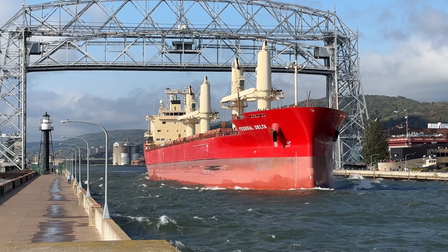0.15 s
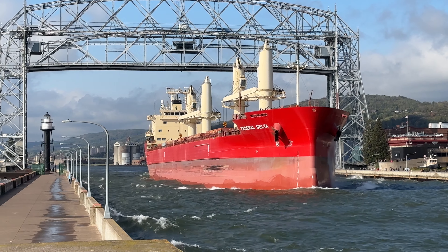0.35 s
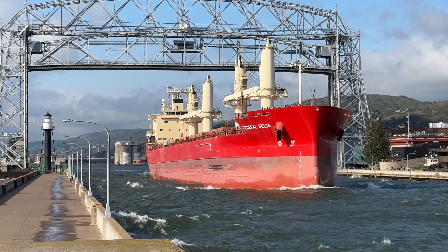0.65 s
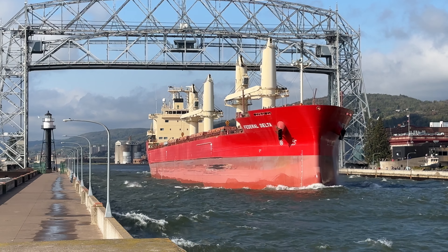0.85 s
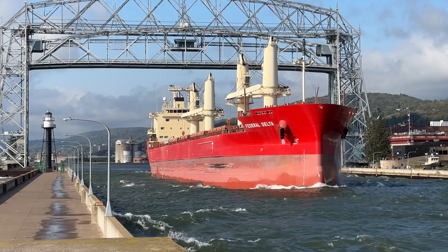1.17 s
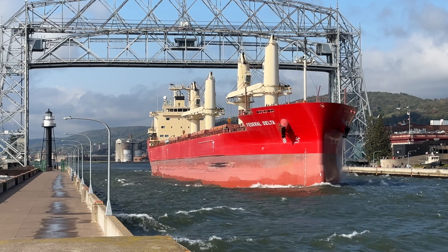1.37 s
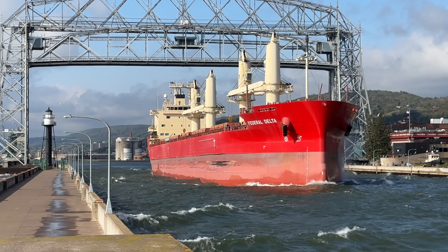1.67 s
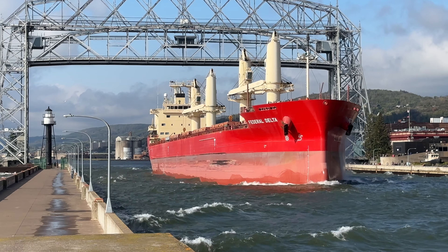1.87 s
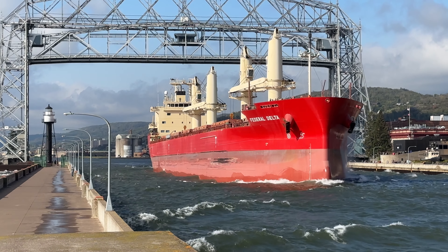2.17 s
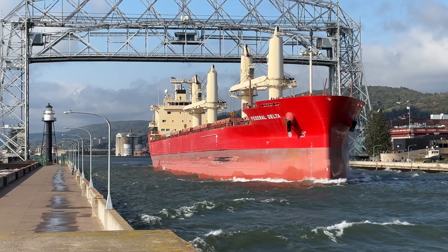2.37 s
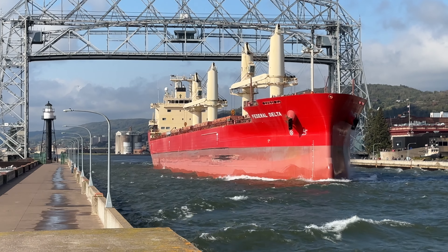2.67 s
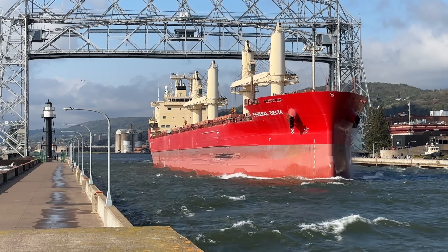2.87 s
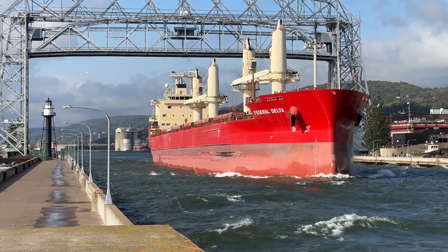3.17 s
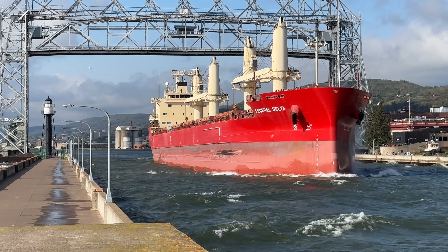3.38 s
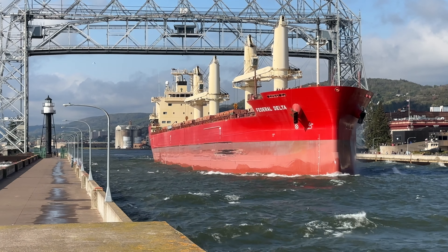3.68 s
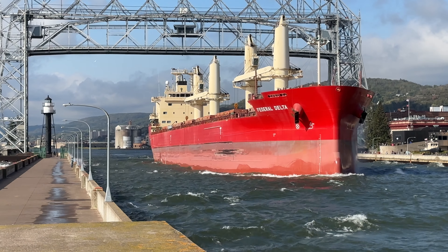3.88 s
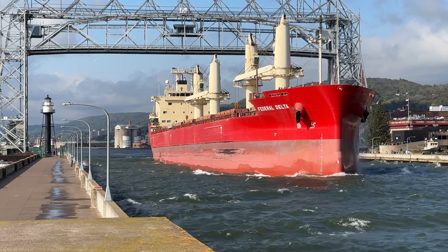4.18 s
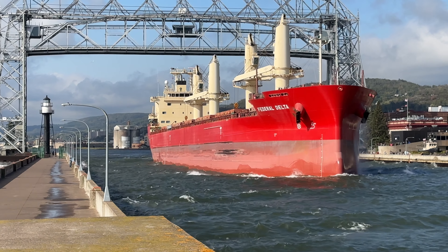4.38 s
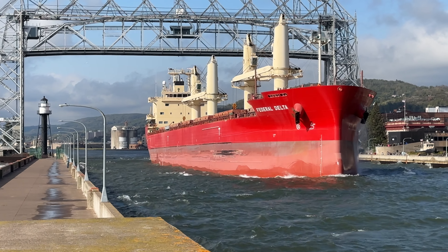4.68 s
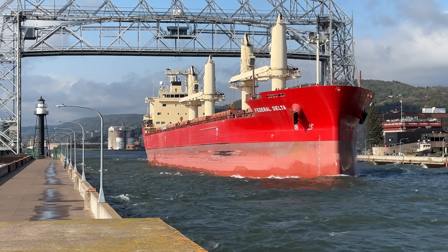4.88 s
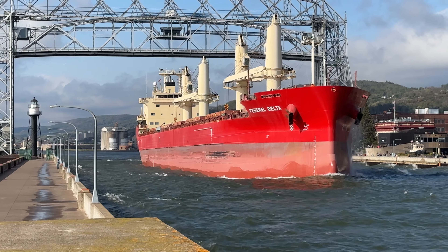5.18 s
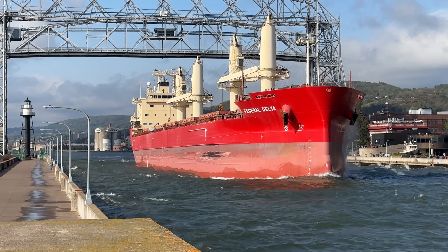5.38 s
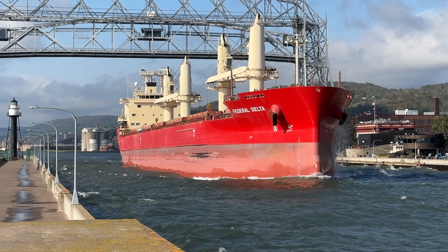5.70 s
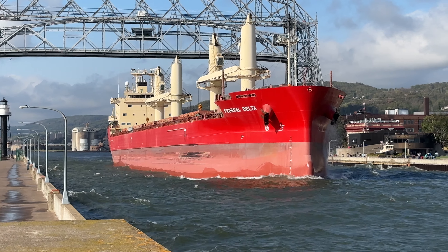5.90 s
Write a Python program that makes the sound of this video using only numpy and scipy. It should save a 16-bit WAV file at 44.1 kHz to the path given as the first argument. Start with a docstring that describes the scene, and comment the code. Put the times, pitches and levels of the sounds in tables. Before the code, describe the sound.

Outdoors by a harbour canal, a huge deep ship horn is already blaring, so loud the microphone distorts. After about a second it stops abruptly and rings off walls and hills. Low wind buffets, faint water wash and ticking spray drops follow. Then a higher, quieter chord of bridge air horns enters, wavering, with a small click and thump early on, and holds to the end.

```python
"""A freighter's deep horn, already sounding in a harbour canal, overloads the microphone, stops and echoes.
Gusts buffet the microphone and flick spray at it over the wash of the water; then a lift bridge answers
with a chord of higher air horns, which is spliced once with a short click and a low thump. Horn tones are
sums of wavering partials, echoes are convolutions with sparse or narrow-band returns, wind and water are
shaped noise, and drops are ticks through a resonant body."""
import sys
import numpy as np
from scipy import signal
from scipy.fft import rfft, irfft
from scipy.io import wavfile
from scipy.ndimage import uniform_filter1d

SR = 44100
rng = np.random.default_rng(int(sys.argv[2]) if len(sys.argv) > 2 else 0)


def waveform_to_disk(signal):
    """Save audio, clipped to [-1, 1], as 16-bit WAV at the path in sys.argv[1]."""
    frames = np.transpose(np.atleast_2d(signal))
    scaled = np.clip(frames, -1, 1) * 32767
    samples = np.round(scaled).astype(np.int16)
    wavfile.write(sys.argv[1], SR, samples)


N = 266628
T = np.arange(N) / SR


def amp(db):
    """Logarithmic level: decibels to amplitude gain."""
    return 10 ** (np.asarray(db) / 20)


def evened(x):
    """Normalisation by mean power: scaled to rms 1."""
    return x / np.sqrt(np.mean(x ** 2) + 1e-20)


def steady(x, size):
    """Envelope division: takes the slow swings out of a sound, leaving rms near 1."""
    local_power = uniform_filter1d(x ** 2, size)
    return x / np.sqrt(local_power + np.mean(x ** 2) / 20)


def read(points, hz):
    """Log-frequency interpolation: a spectrum's value at hz."""
    f, value = np.transpose(points)
    return np.interp(np.log(hz + 1), np.log(f + 1), value)


def curves(rows, t=T):
    """Linear interpolation in time: the columns of a time table at the times t."""
    s, *columns = np.transpose(rows)
    return [np.interp(t, s, column) for column in columns]


def noise(colour, size=N):
    """Spectral shaping: white noise filtered to the given spectrum, at rms 1."""
    spectrum = rfft(rng.standard_normal(size))
    gain = amp(read(colour, np.fft.rfftfreq(size, 1 / SR)))
    return evened(irfft(spectrum * gain, size))


def drift(rate, t=T):
    """Low-pass random modulation: slow chance of rms 1, up to about rate swings a second."""
    grid = np.linspace(-2, 8, 2048)
    hz = np.fft.rfftfreq(len(grid), grid[1] - grid[0])
    spectrum = rfft(rng.standard_normal(len(grid))) / (1 + (hz / rate) ** 4)
    return np.interp(t, grid, evened(irfft(spectrum)))


def partial_db(partials, top, k, hz):
    """Harmonic spectrum: partial k is listed if low, and read from the overtone envelope above."""
    return partials[k - 1] if k <= len(partials) else read(top, k * hz)


def harbour(x, colour, t60, delay):
    """Diffuse reverberation: sparse taps of random sign, each band decaying at its own rate."""
    taps = rng.choice([-1., 1.], 2 * SR) * (rng.random(2 * SR) < .1)
    hz, t, bands = signal.stft(taps, SR, nperseg=1024)
    bands = bands * amp(-60 * t / read(t60, hz)[:, None])
    tail = signal.istft(bands * amp(read(colour, hz))[:, None], SR, nperseg=1024)[1]
    tail = tail / np.linalg.norm(taps[:SR // 20])
    tail = np.r_[np.zeros(int(delay * SR)), tail]
    return signal.fftconvolve(x, tail)[:len(x)]


# ship's horn: a steady note that swells a little until the valve shuts
SHIP_HZ, SHUT_S, SWELL_DB_PER_S = 133, 0.9058, 2.5
# as the pressure falls the pitch sags, the overtones flare once and dull, and the note dies
SAG_HZ, SAG_S, FLARE_DB, FLARE_S, DULL_DB_PER_S = 10, 0.0274, 9, 0.037, 58
RELEASE_DB_PER_S, RELEASE_KNEE_S = 354.5, 0.037


def valve(t):
    """Pressure release: pitch, level and overtone boost under steady air, then as the valve shuts."""
    shut = np.maximum(t - SHUT_S, 0)
    swell = SWELL_DB_PER_S * np.clip(t, 0, SHUT_S)
    hz = SHIP_HZ - SAG_HZ * (1 - np.exp(-(shut / SAG_S) ** 2))
    db = swell - RELEASE_DB_PER_S * shut ** 2 / (shut + RELEASE_KNEE_S)
    flare = FLARE_DB * np.exp(-(2 * (shut / FLARE_S - 1)) ** 2)
    return hz, db, swell + flare - DULL_DB_PER_S * shut


# first eight partials early and late in the blast, as wind bends the path: one relative level [dB] each
SHIP_EARLY_PARTIALS = [-9, -.5, -12, -6, -16, -18, -21.5, -20]
SHIP_LATE_PARTIALS = [-4, -0.5, -9, -3.5, -20, -18, -20.5, -22.5]
# overtone envelope above them: (frequency [Hz], relative level [dB])
SHIP_OVERTONES = [(1200, -35.5), (1500, -38), (1800, -32.5), (2200, -38), (3000, -44), (4200, -44.5),
                  (7000, -52.5), (16000, -75)]
# distinct returns from the canal wall, buildings and hills:
# (delay [s], level [dB], lowest frequency [Hz], highest frequency [Hz])
DISTINCT_RETURNS = [(.13, -16, 70, 450), (.188, -10.5, 365.6, 440), (.25, -19, 870, 1000),
                    (.37, -21.5, 673, 747.6), (.17, -16, 2380, 2620), (.39, -17, 2380, 2580),
                    (.48, -28, 1740, 1920), (1.28, -56.5, 220, 420)]
# diffuse harbour echo: (frequency [Hz], relative level [dB])
ECHO_COLOUR = [(250, -9.5), (520, -18), (700, -0.5), (1000, 0), (1500, -7), (1850, 1.5), (2150, -9.5),
               (2500, 7), (2850, -0.5), (3500, -2.5), (7000, -30.5)]
# its reverberation time: (frequency [Hz], time to fall 60 dB [s])
ECHO_DECAY = [(130, 1.2), (700, .8), (1400, 1.4), (2450, 1.3), (7000, 0.18)]


def ship_horn(level_db=-6, overtone_db=1.0, echo_db=-20, blur_db=-7, far_db=-50, far_t60=3.5):
    """Periodic flow modulation: a diaphragm chops air into a long bell, and the harbour echoes it."""
    jitter, flutter, hiss_db, waver_db = .0013, .25, -28, 4.6
    t = np.arange(-SR, N) / SR  # begins a second early, so the harbour is already full of echo
    u = t[t < SHUT_S + .25]
    hz, db, bright_db = valve(u)
    phase = 2 * np.pi * np.cumsum(hz * (1 + jitter * drift(55, u))) / SR
    late = np.interp(u, [.48, .62], [0, 1])
    tone, waver = np.zeros(len(u)), drift(2, u)
    for k in range(1, 100):
        height = min(k / 10, 1)  # turbulent air disturbs short waves most, and neighbours alike
        waver = (waver + 2 * drift(3 + k / 10, u)) / np.hypot(1, 2)
        early_level = partial_db(SHIP_EARLY_PARTIALS, SHIP_OVERTONES, k, SHIP_HZ)
        late_level = partial_db(SHIP_LATE_PARTIALS, SHIP_OVERTONES, k, SHIP_HZ)
        level = (1 - late) * early_level + late * late_level
        level = level + height * (overtone_db + bright_db) + height ** 2 * waver_db * waver
        wander = height ** 2 * (drift(1.1, u) + flutter * drift(44, u))
        tone += amp(level) * np.sin(k * phase + wander)
    # air escapes in a puff each cycle
    hiss = noise([(400, -1.5), (1300, -6.5), (2600, -11.5), (7000, -19.0), (16000, -29.0)], len(u))
    tone += amp(hiss_db + bright_db / 2) * hiss * (1 + np.cos(phase) / 2)
    direct = np.pad(tone * amp(db + level_db), (0, len(t) - len(u)))

    returns = np.zeros(len(t))
    for delay, gain_db, lo, hi in DISTINCT_RETURNS:
        band = signal.butter(N=3, Wn=[lo, hi], btype="band", fs=SR, output="sos")
        returns += amp(gain_db) * signal.sosfilt(band, np.interp(t - delay, t, direct))
    # the returns a little blurred; the diffuse echo of nearby buildings; a long hum from the hills
    returns = returns + amp(blur_db) * harbour(returns, [(1, 0.0072)], [(1, 0.34)], delay=0)
    near = harbour(direct, ECHO_COLOUR, ECHO_DECAY, delay=.06)
    far_colour = [(130, -8.0), (270, -0.5), (530, -10), (4000, -21.5)]
    far = harbour(direct, far_colour, [(1, far_t60)], delay=0.21)
    return (direct + returns + amp(echo_db) * near + amp(far_db) * far)[SR:]


BREEZE_DB, GUST_ATTACK_S, GUST_RELEASE_S = -50, 0.028, 0.027
# gusts on the microphone, over a steady breeze: (start [s], length [s], level [dB])
GUST_TIMES = [(-0.1, 1.13, -41), (1.585, 0.15, -37.5), (2.369, 0.26, -33), (3.02, 0.37, -37),
              (3.156, 0.14, -29.5), (3.681, 0.056, -35.5), (3.746, 0.67, -47.5), (3.949, 0.07, -36),
              (4.375, 0.079, -37), (5.497, 0.086, -38)]


def wind_strength():
    """Addition of powers: each gust rises, holds and dies away on top of the breeze."""
    power = amp(BREEZE_DB) ** 2
    for start, length, db in GUST_TIMES:
        rise = np.clip((T - start) / GUST_ATTACK_S, 0, 1)
        fall = np.exp(-np.maximum(T - start - length, 0) / GUST_RELEASE_S)
        power = power + (amp(db) * rise * fall) ** 2
    return np.sqrt(power)


# spectrum of the turbulence: (frequency [Hz], relative level [dB])
WIND_COLOUR = [(12, -23), (20, -0.5), (83, -4.5), (171, -16.5), (357, -39), (1000, -54.5), (1600, -100)]
# single low thumps: pushes of air, and the last one the thump of the splice:
# (time [s], peak level [dB], pitch [Hz])
LOW_THUMPS = [(2.463, -19, 52.6), (3.083, -26.5, 50), (3.998, -27, 69), (4.768, -24, 130)]


def wind_and_thumps():
    """Turbulent pressure fluctuation: low noise at the microphone; single low thumps are added to it."""
    out = wind_strength() * steady(noise(WIND_COLOUR), size=4000)
    for s, db, hz in LOW_THUMPS:
        u = 2 * np.pi * hz * (T - s)
        out += amp(db) * u * np.exp((1 - u ** 2) / 2)  # one swing each way, peaking at 1
    return out


# spectrum of the wash: (frequency [Hz], relative level [dB per Hz])
WATER_COLOUR = [(100, -9), (280, -7.5), (600, -14.5), (3000, -31.5), (15000, -55)]


def water(level_db=-63.5):
    """Broadband noise of many small impacts: choppy water washes along the pier."""
    return amp(level_db + drift(2.3) / 2) * noise(WATER_COLOUR)


# fine spray falls at random over this stretch
SPRAY_FROM_S, SPRAY_TO_S = 2.3, 4.4
# larger drops of spray on the microphone: (time [s], relative level [dB])
LARGE_DROPS = [(2.393, -38), (2.4119, -39), (2.4818, -28), (2.5546, -49), (2.5722, -46), (2.5923, -27),
               (2.707, -39), (3.044, -50), (3.076, -37.5), (3.2137, -35), (3.2244, -23.5), (3.245, -36),
               (3.27, -29.5), (3.338, -34), (3.3572, -29), (3.3857, -37.5), (3.683, -37), (3.707, -23.5),
               (3.7328, -24.5), (3.7487, -28), (3.8087, -49), (3.819, -37), (3.8636, -35), (3.8822, -32),
               (3.9449, -31.5), (4.109, -42.5), (4.148, -32.5), (4.2529, -37.5), (4.2812, -45),
               (4.3006, -43), (4.3926, -30.5), (4.404, -31), (4.4917, -31), (4.6865, -24.5),
               (4.8673, -26.5), (4.9382, -29)]
# resonance of the body they strike: (frequency [Hz], gain [dB])
BODY_COLOUR = [(1500, -7), (2050, 10), (2900, 1.5), (6500, 8), (9000, 2), (15000, -28.5)]
# spectrum of the soft splash: (frequency [Hz], relative level [dB per Hz])
SPLASH_COLOUR = [(1500, -16), (2050, 2), (2700, -9), (7000, -12), (10000, -26.5)]


def spray(level_db=5, sizzle_db=-17, sizzle_s=0.0025, splash_db=-47, splash_s=0.02,
          fine_db=-45, fine_per_s=22, spread_db=7, full_gust_db=-40):
    """Impulse response: each large drop is a double tick on the microphone body, a sizzle and a splash."""
    t = np.arange(SR // 20) / SR
    # finer drops come with the gusts
    hits = (rng.random(N) < fine_per_s / SR) * amp(fine_db + spread_db * rng.uniform(-1, 1, N))
    hits *= np.minimum(wind_strength() / amp(full_gust_db), 1) * (T > SPRAY_FROM_S) * (T < SPRAY_TO_S)
    wet = np.zeros(N)
    for s, db in LARGE_DROPS:
        tick = rng.standard_normal(len(t)) * amp(sizzle_db) * np.exp(-t / sizzle_s)
        tick[0] = 1
        tick[rng.integers(2, 20)] += rng.random() - .5  # the second tick colours each drop differently
        part = hits[round((s + .001) * SR):][:len(t)]
        part += amp(db + level_db) * tick[:len(part)]  # a view: this adds into hits
        wet += amp(db) * (T > s) * np.exp(-abs(T - s) / splash_s)
    # minimum-phase response, so the body rings only after each hit
    log_gain = np.log(amp(read(BODY_COLOUR, abs(np.fft.fftfreq(2048, 1 / SR)))))
    body = np.fft.ifft(np.exp(np.conj(signal.hilbert(log_gain)))).real[:1024]
    splash = amp(splash_db) * np.sqrt(wet) * noise(SPLASH_COLOUR)
    return signal.fftconvolve(hits, body)[:N] + splash


# bridge horns, low to high; each reed starts sharp and settles:
# (start [s], pitch [Hz], relative level [dB], swell [dB per s], sharp by [Hz], attack [s])
BRIDGE_REEDS = [(4.375, 255.0, 1, -1, 2.917, 0.033), (4.39, 291.7, -13, 9, 2, 0.018),
                (4.366, 298.3, -.5, -2, 5.97, 0.017), (4.32, 355.0, -2.5, 3, 12.9, 0.019)]
# overtone envelope they share: (frequency [Hz], relative level [dB])
BRIDGE_OVERTONES = [(1800, -12.5), (2350, -19.5), (2700, -27.5), (3100, -21.5), (4200, -27.5), (4800, -41),
                    (6500, -43.5), (8500, -78)]


def air_horn(row, partials, hunt_hz, t, settle_s=0.0639, blur_s=0.24):
    """Self-sustained reed oscillation: it starts sharp and settles; partials waver over the water."""
    jitter, scatter, waver_db = .0024, .42, 4.4
    start, pitch, db, swell_db_per_s, sharp_hz, attack_s = row
    age = np.maximum(t - start, 0)
    hz = pitch + hunt_hz + sharp_hz * np.exp(-(age / settle_s) ** 2)
    settled = np.tanh(((t - t[0]) / blur_s) ** 2)  # reflections arrive and blur the short waves
    phase = 2 * np.pi * np.cumsum(hz * (1 + jitter * settled * drift(27, t))) / SR
    tone = np.zeros(len(t))
    for k in range(1, 28):
        level = partial_db(partials, BRIDGE_OVERTONES, k, pitch)
        level = level + waver_db * min(k / 2, 1) * drift(6.05, t)
        blur = scatter * k * pitch / 2000 * settled
        tone += amp(level) * np.sin(k * phase + 2 * np.pi * rng.random() + blur * drift(9.8, t))
    return tone * amp(db + swell_db_per_s * age) * np.minimum(age / attack_s, 1)


# the highest reed's opening bark, strong in odd partials: one level [dB] each, from the first up
BARK_LEVELS = [-31.5, -48, -34.5, -36, -30, -51.5, -32.5, -58, -48]


def bark(age, sharp_hz=15, settle_s=0.06, attack_s=0.028, decay_s=0.14, hiss_db=-56, top_db=-60):
    """Starting transient: the first air through the highest reed gives a sharp, hollow note and a puff."""
    phase = 2 * np.pi * np.cumsum(BRIDGE_REEDS[-1][1] + sharp_hz * np.exp(-age / settle_s)) / SR
    partials = list(BARK_LEVELS) + list(top_db + 2 * rng.standard_normal(10))
    tone = np.zeros(len(age))
    for k, db in enumerate(partials, 1):
        roughness = (k / 10) ** 2 * drift(80, age) / 2
        tone += amp(db) * np.sin(k * phase + 2 * np.pi * rng.random() + roughness)
    puff = amp(hiss_db) * noise([(6500, 0.5), (8500, -39)], len(age))
    return (tone + puff) * np.minimum(age / attack_s, 1) ** 2 * np.exp(-age / decay_s)


def whistle(t, at_s=4.57, length_s=0.096, level_db=-39):
    """Prominent harmonic: the eighth partial of the highest reed rings out as its pitch settles."""
    hz = 8 * BRIDGE_REEDS[-1][1]
    envelope = amp(level_db) * np.exp(-((t - at_s) / length_s) ** 2)
    return envelope * np.sin(2 * np.pi * hz * t + drift(20, t) / 2)


# first six partials of each bridge horn, in the order of the reeds: one relative level [dB] each
LOW_REED = [-0.5, -8.5, -3, -4.5, -9, -8]
FLAT_REED = [0.5, -3.5, -14, -3, -18.5, -10.5]
MIDDLE_REED = [2.5, -6, -2, -9, -20, -17]
HIGH_REED = [1, 1, -0.5, -19, -12.5, -13]
# the lowest reed hunts before it finds its note: (time [s], off pitch by [Hz])
LOW_REED_HUNT = [(4.49, -0.5), (4.53, 6.5), (4.77, 5.5), (4.83, -5), (4.94, -0.55), (6.05, 1)]
# spectrum of the rasping air: (frequency [Hz], relative level [dB])
RASP_COLOUR = [(120, 2), (260, -15.5), (1100, -4.5), (2100, -12.5), (2700, -15.5), (4100, -16.5),
               (6800, -35), (8500, -54)]
# the chord as the wind carries it: (time [s], bass level [dB], treble level [dB])
CHORD_LEVELS = [(4.4, -25.5, -41.5), (4.53, -24, -31), (4.78, -24, -43), (4.87, -22.5, -36),
                (5.1, -24, -43), (5.32, -24.5, -31), (5.63, -22, -40), (5.746, -28.5, -44.5),
                (6.04, -31, -45)]
# level of the chord between 440 and 830 Hz: (time [s], level [dB])
THROAT_LEVELS = [(4.75, -29), (4.93, -25.5), (5.05, -31), (5.24, -30), (5.35, -24), (5.66, -26),
                 (5.9, -33.5)]
# level of the chord around 2.2 kHz: (time [s], level [dB])
BRASS_LEVELS = [(4.5, -49.5), (4.72, -41), (5.05, -48.5), (5.6, -35.5), (5.75, -45), (6.0, -48)]
# how fast the chord's body, blare and treble come in
BODY_ATTACK_S, BLARE_ATTACK_S, EDGE_ATTACK_S = 0.078, 0.11, 0.033
# the blare around 1 kHz follows the bass, and drops as the chord mellows
BLARE_DB, MELLOW_DB, MELLOW_S, MELLOW_OVER_S = -2.5, -6, 5.316, 0.18
# the edge follows the mean of bass and treble; the opening surge of air lifts the rasp
EDGE_DB, SURGE_S = -16, 0.31
RASP_DB, SURGE_RASP_DB, RASP_ATTACK_S = -13, 6.5, .18
# a splice in the sound: the polarity flips with a short click
SPLICE_S, SPLICE_WIDTH_S = 4.771, 0.001


def bridge_horns(echo_db=-15):
    """Superposition: four horns on one air line, with rasp; wind carries the registers unevenly."""
    t = T[T >= min(row[0] for row in BRIDGE_REEDS)]
    age = t - t[0]
    surge = np.exp(-(age / SURGE_S) ** 4)
    voices = [LOW_REED, FLAT_REED, MIDDLE_REED, HIGH_REED]
    hunts = [curves(LOW_REED_HUNT, t)[0], 0, 0, 0]
    reeds = zip(BRIDGE_REEDS, voices, hunts)
    chord = evened(sum(air_horn(row, partials, hunt, t) for row, partials, hunt in reeds))
    rasp_gain = amp(RASP_DB + SURGE_RASP_DB * surge) * np.minimum(age / RASP_ATTACK_S, 1) ** 2
    chord += rasp_gain * noise(RASP_COLOUR)[:len(t)]

    bass, treble = curves(CHORD_LEVELS, t)
    throat, brass = curves(THROAT_LEVELS, t)[0], curves(BRASS_LEVELS, t)[0]
    blare = bass + BLARE_DB + MELLOW_DB * np.clip((t - MELLOW_S) / MELLOW_OVER_S, 0, 1)
    edge = (bass + treble) / 2 + EDGE_DB
    registers = [(bass, BODY_ATTACK_S), (throat, BODY_ATTACK_S), (blare, BLARE_ATTACK_S),
                 (treble, EDGE_ATTACK_S), (brass, BLARE_ATTACK_S), (edge, EDGE_ATTACK_S)]
    # lower limit of each register [Hz]; anything below the first is left out
    band = np.digitize(np.fft.rfftfreq(len(t), 1 / SR), [170, 440, 830, 1460, 1950, 2420]) - 1
    spectrum = rfft(chord)
    carried = np.zeros(len(t))
    for k, (db, attack_s) in enumerate(registers):
        register = steady(irfft(spectrum * (band == k), len(t)), size=6000)
        carried += amp(db) * np.minimum(age / attack_s, 1) ** 2 * register
    direct = np.pad(carried + bark(age) + whistle(t), (N - len(t), 0))
    heard = direct + amp(echo_db) * harbour(direct, [(1, 3)], ECHO_DECAY, delay=0.058)
    return heard * np.tanh((T - SPLICE_S) / SPLICE_WIDTH_S)


def scene():
    """Linear superposition: both horns, wind, thumps, water and spray at one microphone."""
    return (ship_horn() + bridge_horns() + wind_and_thumps() + water() + spray())[None]


def record(dry, ceiling=0.67, knee=6, edge_hz=15650):
    """Saturation: the microphone flattens the crests of the ship's horn; then a low-pass band limit."""
    clipped = dry / (1 + abs(dry / ceiling) ** knee) ** (1 / knee)
    low_pass = signal.firwin(511, edge_hz, window=("kaiser", 9), fs=SR)
    return signal.oaconvolve(clipped, low_pass[None], "same")


dry = scene()
out = record(dry)
waveform_to_disk(out)
```